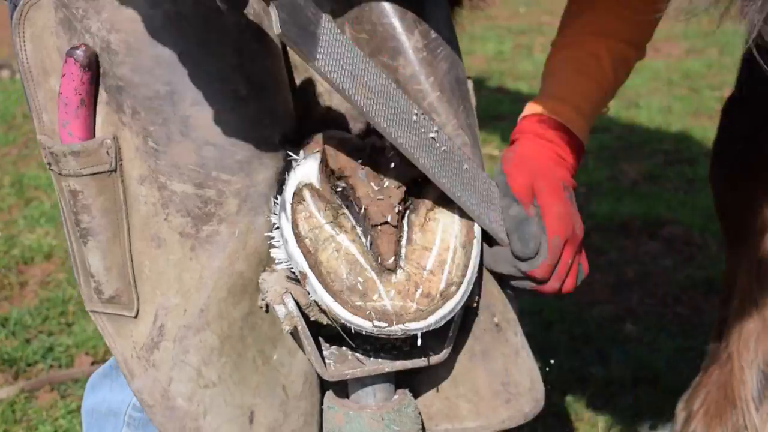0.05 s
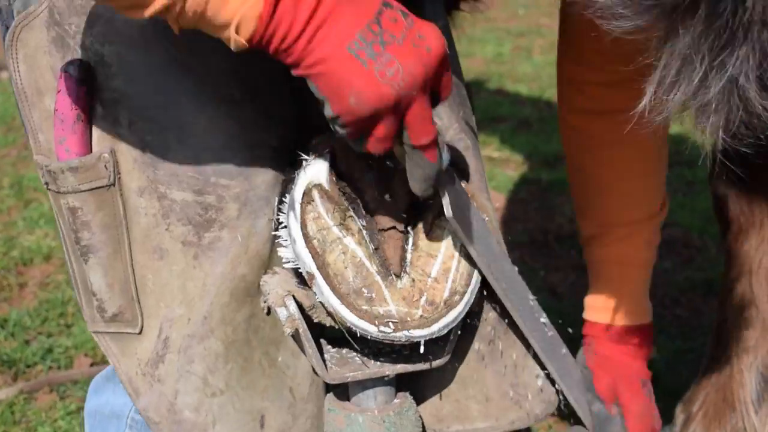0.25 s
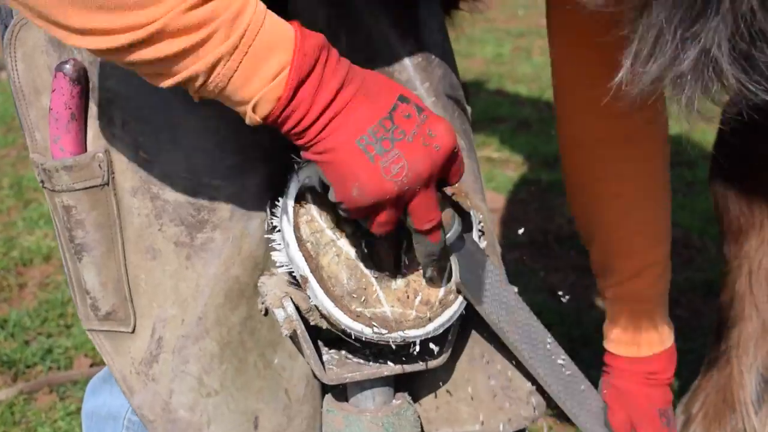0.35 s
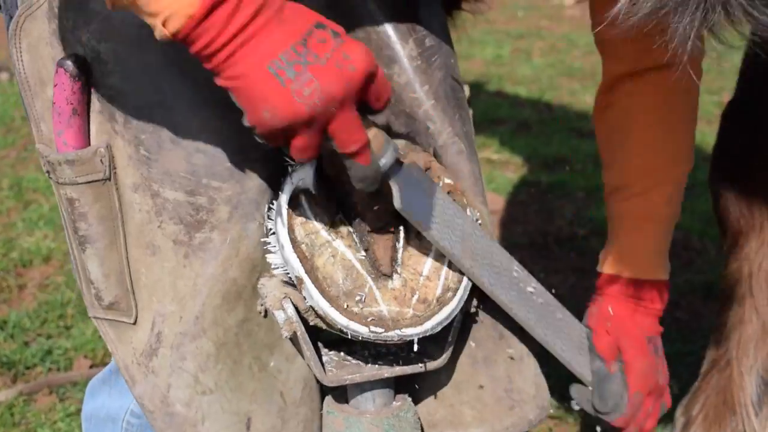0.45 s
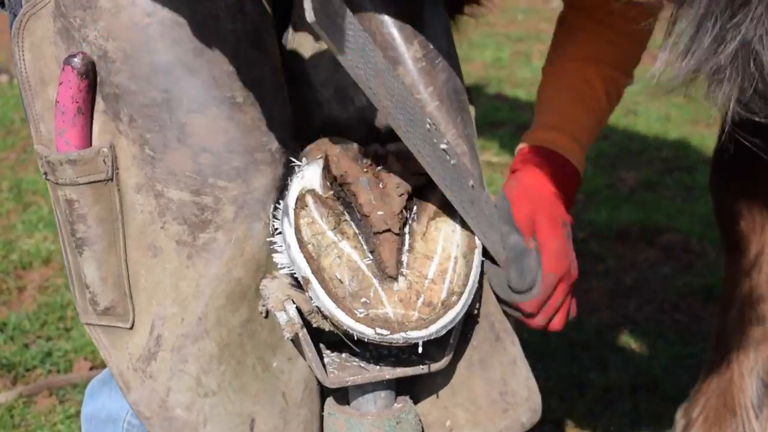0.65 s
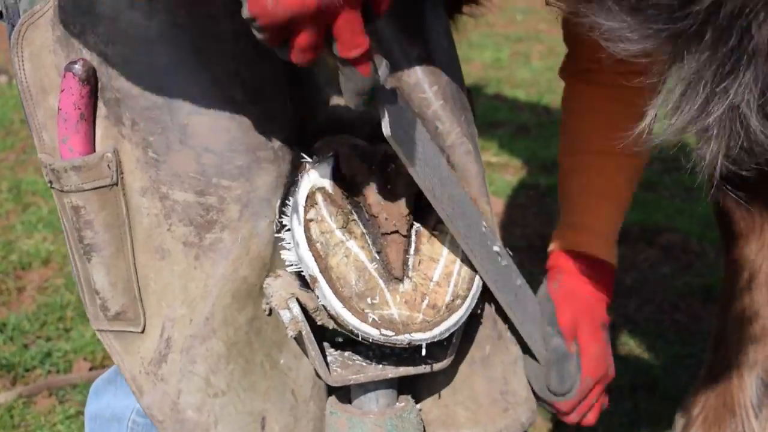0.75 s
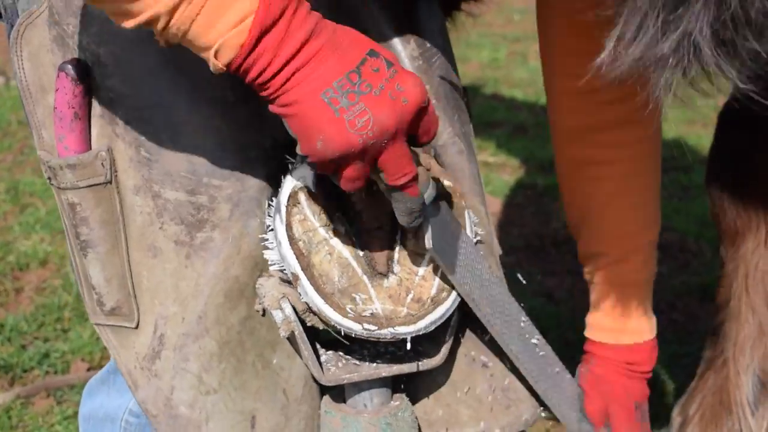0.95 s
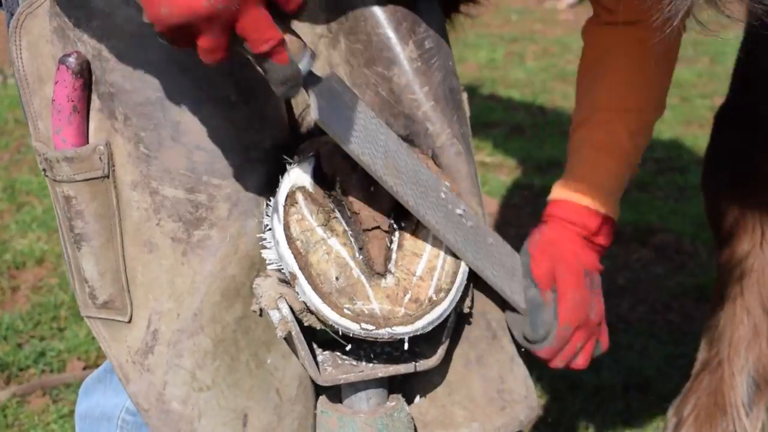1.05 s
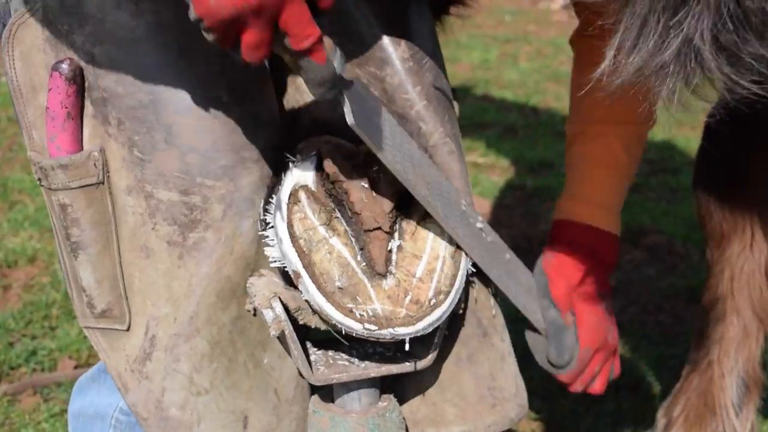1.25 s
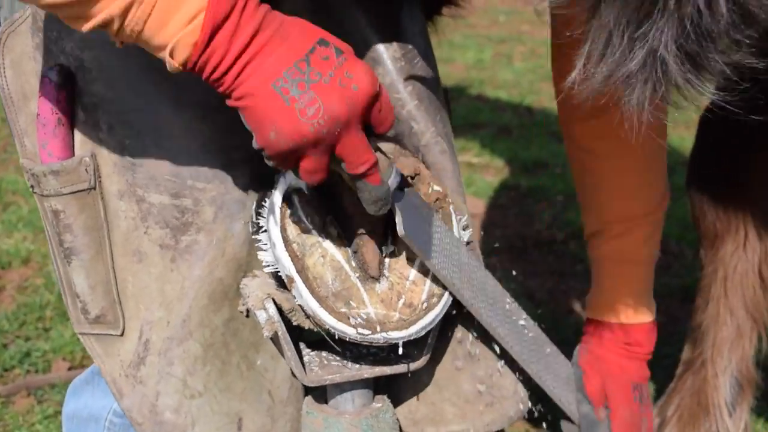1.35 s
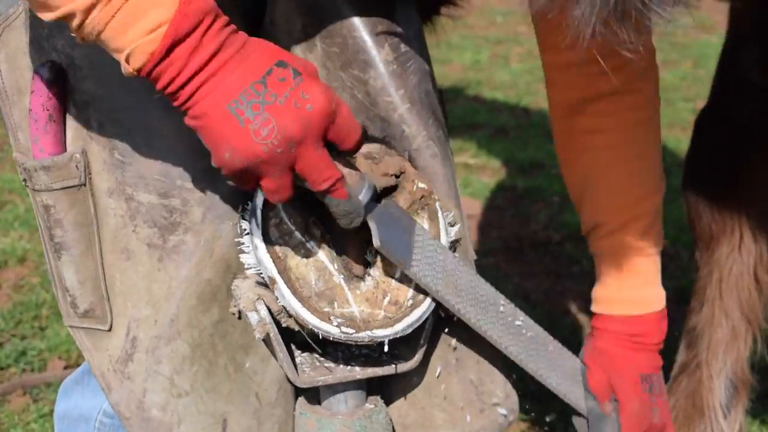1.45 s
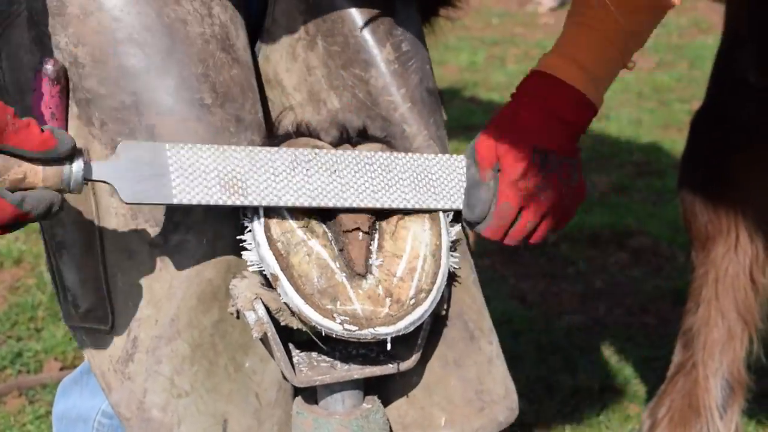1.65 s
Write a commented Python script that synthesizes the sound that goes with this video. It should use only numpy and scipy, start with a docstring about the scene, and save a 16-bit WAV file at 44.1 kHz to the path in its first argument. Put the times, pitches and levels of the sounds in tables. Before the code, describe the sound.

Close, gritty rasping on a horse's hoof outdoors, hard strokes alternating with squeaky, hissing returns.

```python
"""A steel rasp skates and squeaks over a horse's hoof, then bites in the first of three hard pushes.
A farrier is filing outdoors, close to the microphone, with faint air and a short yard echo behind.
On each push the tooth rows catch and judder the hoof under a gritty scrape of tearing horn.
On the light return strokes the rasp hisses and its steel rings; it lands with a crunch and a thud.
This close, the loudest judder clips."""
import sys
import numpy as np
from scipy import signal
from scipy.fft import rfft, irfft, next_fast_len
from scipy.io import wavfile
from scipy.ndimage import uniform_filter1d, map_coordinates

SR = 44100
rng = np.random.default_rng(int(sys.argv[2]) if len(sys.argv) > 2 else 0)


def store_pcm(level_fs):
    """Save levels as 16-bit WAV."""
    pcm = np.round(np.clip(level_fs, -1, 1) * 32767).astype(np.int16)
    wavfile.write(sys.argv[1], SR, np.atleast_2d(pcm).T)


N = 74970
TIME = np.arange(N) / SR


def amp(db):
    return 10 ** (np.asarray(db) / 20)


def unit(x):
    return x / np.sqrt(np.mean(x ** 2) + 1e-20)


def even(x, size=1100):
    """x held at a running rms of 1."""
    power = uniform_filter1d(uniform_filter1d(x ** 2, size), size // 2)
    return x / np.sqrt(np.abs(power) + 1e-3 * np.mean(x ** 2))


def wobble(rate):
    """A smooth random curve, rate knots a second."""
    return map_coordinates(rng.standard_normal(600), [TIME * rate], mode="wrap")


def envelope(strokes, column, fade_s=0.0081):
    """Gain per sample from one dB column of the strokes; silent between them."""
    gain = np.zeros(N)
    for rows in map(np.array, strokes):
        s = rows[:, 0]
        fade = np.clip(1 + np.minimum(TIME - s[0], s[-1] - TIME) / fade_s, 0, 1)
        gain += amp(np.interp(TIME, s, rows[:, column])) * fade
    return gain


def filtered(x, response):
    """x shaped by a gain that is a function of Hz."""
    size = next_fast_len(N + SR // 2)
    return irfft(rfft(x, size) * response(np.fft.rfftfreq(size, 1 / SR)), size)[:N]


def coloured(x, points):
    """x shaped by (Hz, dB) points on a log frequency axis."""
    knots_hz, db = np.transpose(points)
    return filtered(x, lambda hz: amp(np.interp(np.log(hz + 1), np.log(knots_hz), db)))


def ring(x, modes):
    """x through damped modes; dB is the relative energy of each."""
    t = np.arange(SR // 3) / SR
    impulse = np.zeros(len(t))
    for k, (hz, db, t60) in enumerate(modes):
        decay = np.exp(-np.log(1000) * t / t60)
        impulse += (-1) ** k * amp(db) / np.sqrt(t60) * decay * np.cos(2 * np.pi * hz * t)
    return signal.fftconvolve(x, impulse / np.linalg.norm(impulse))[:N]


# The open air around the microphone. Each row: frequency in Hz, relative level in dB.
AIR_COLOUR = [(25, -16), (150, 4.5), (300, -6), (1000, -7.5), (3000, -17.5), (8000, -31.5), (15000, -41)]
def air(level_db=-49):
    """Steady, low outdoor noise, well behind the work."""
    return amp(level_db) * unit(coloured(rng.standard_normal(N), AIR_COLOUR))


# The tone of the yard's echo. Each row: frequency in Hz, gain in dB.
YARD_COLOUR = [(100, -6), (500, -0.5), (1500, 3), (3000, -4), (12000, -25)]
def yard_echo(x, gain_db=-20, t60_s=0.23):
    """Ground and surroundings scatter a short, dull answer back to the microphone."""
    t = np.arange(SR // 2) / SR
    tail = rng.standard_normal(len(t)) * np.exp(-np.log(1000) * t / t60_s)
    echo = signal.fftconvolve(x, tail / np.linalg.norm(tail))[:N]
    return amp(gain_db) * coloured(echo, YARD_COLOUR)


# The rasp's modes. Each row: frequency in Hz, relative level in dB, 60 dB decay time in seconds.
STEEL_MODES = [(960, -7, 0.047), (1358, -1.5, 0.12), (1851, -3.5, 0.047), (3094, 0, 0.065),
               (3664, -0.5, 0.074), (4600, -2.5, 0.088), (4820, -8, 0.047), (5680, -9, 0.031),
               (5943, -1, 0.14), (7140, 0, 0.047), (8470, -4, .08), (9735, -12.5, 0.035),
               (11830, -14.5, 0.39), (13040, -13, .12), (13580, -16, 0.19)]
def steel(x, flicker_db=3, flicker_rate=35):
    """The rasp rings; each mode swells and fades as the contact passes its nodes."""
    total = np.linalg.norm([amp(db) for _, db, _ in STEEL_MODES])
    ringing = np.zeros(N)
    for hz, db, t60 in STEEL_MODES:
        flicker = unit(amp(flicker_db * wobble(flicker_rate)))
        ringing += amp(db) / total * ring(x * flicker, [(hz, db, t60)])
    return ringing


# Squeaks of the steel. Each row: centre in seconds, pitch in Hz, peak in dB, half length in seconds.
STEEL_SQUEAKS = [(.015, 1344, -33, 0.015), (0.065, 1317, -34, 0.005), (0.02, 7195, -34.5, 0.022),
                 (0.064, 7160, -31.5, .01), (0.357, 4740, -43, 0.035), (0.582, 8480, -35, 0.008),
                 (0.595, 5960, -37, 0.014), (0.621, 4810, -36, 0.015), (0.59, 5560, -36, .008),
                 (0.633, 4513, -34, 0.0076), (0.688, 3060, -51, 0.038), (1.101, 7190, -26.5, 0.0091),
                 (1.149, 5965, -45, 0.042), (1.185, 12040, -47.5, 0.025), (1.189, 4660, -49.5, 0.019),
                 (1.244, 4520, -36, 0.0099), (1.365, 7210, -27, 0.015), (1.608, 1312, -38.5, 0.049)]
def squeaks(waver_rad=0.21):
    """Friction locks briefly onto one mode of the rasp."""
    tones = np.zeros(N)
    for s, hz, db, half_s in STEEL_SQUEAKS:
        drift = unit(uniform_filter1d(uniform_filter1d(rng.standard_normal(N), size=200), size=200))
        swell = amp(db) * np.exp(-((TIME - s) / half_s) ** 2)
        tones += swell * np.sin(2 * np.pi * hz * TIME + waver_rad * drift)
    return tones


# The edge catches. Each row: centre in seconds, pitch in Hz, level in dB, half length in seconds.
EDGE_CATCHES = [(1.305, 4030, -30, 0.037), (0.216, 3900, -28.5, 0.021)]
def screeches(width_hz=420):
    """A rough, bright band of friction where the edge catches early in a push."""
    friction = np.zeros(N)
    for s, hz, db, half_s in EDGE_CATCHES:
        band = filtered(rng.standard_normal(N), lambda f: np.exp(-((f - hz) / width_hz) ** 2))
        swell = amp(db) * np.exp(-((TIME - s) / half_s) ** 2)
        friction += swell * unit(band)
    return friction


# Hoof and leg modes. Each row: frequency in Hz, relative level in dB, 60 dB decay time in seconds.
HOOF_MODES = [(120.3, -2, 0.074), (162.8, 0, 0.075), (218.3, -1, 0.045), (311, -8, 0.02)]
def hoof(x, low_hz=105, high_hz=350):
    """Hoof and leg boom when shaken, within their own low register."""
    boom = ring(x, HOOF_MODES)
    return filtered(boom, lambda hz: (1 - 1 / (1 + (hz / low_hz) ** 6)) / (1 + (hz / high_hz) ** 14))


def bursts(pulses, decay_s):
    """Each pulse becomes a short exponential tail."""
    return signal.lfilter([1], [1, -np.exp(-1 / (decay_s * SR))], pulses)


# The rasp lands on the hoof. Each row: start in seconds, crunch and thud strengths in relative dB.
LANDINGS = [(0.16, -30, -28), (0.216, -18.5, -36), (0.468, -22.5, -26.5), (1.017, -29, -38),
            (1.058, -33, -31), (1.22, -28, -32), (1.524, -44, -45)]
# The tone of the crunch. Each row: frequency in Hz, gain in dB.
CRUNCH_COLOUR = [(200, 9), (900, 7.5), (2500, 6), (4500, 0.5), (8000, -12), (15000, -27)]
def landings(crunch_db=-3, ring_db=-10, thud_db=21, rise_s=0.0018, decay_s=0.0055):
    """Steel meets horn with a short crunch, a ring and a soft thud."""
    blows, thuds = np.zeros(N), np.zeros(N)
    for s, blow_db, low_db in LANDINGS:
        at = round(s * SR)
        blows[at], thuds[at] = amp(blow_db), amp(low_db)
    contact = bursts(bursts(blows, decay_s), rise_s) / (rise_s * SR)
    crunch = contact * rng.standard_normal(N)
    return (amp(crunch_db) * coloured(crunch, CRUNCH_COLOUR)
            + amp(ring_db) * ring(crunch, STEEL_MODES)
            + amp(thud_db) * hoof(thuds))


def grit(chips_db, scatter_db, chips_per_s=5000):
    """Horn breaks away as fine hiss plus separate chips of uneven size."""
    breaks = (rng.random(N) < chips_per_s / SR) * rng.choice([-1, 1], N)
    sizes = amp(scatter_db * np.clip(rng.standard_normal(N), -2, 2))
    return unit(rng.standard_normal(N) + amp(chips_db) * unit(breaks * sizes))


def moving_contact(x, patchy_db):
    """Peaks and dips wander through the spectrum as the contact moves along the rasp."""
    spectra = signal.stft(x, nperseg=512)[2]
    patches = uniform_filter1d(rng.standard_normal(spectra.shape), size=4, axis=0)
    patches = unit(uniform_filter1d(patches, size=7, axis=1))
    return unit(signal.istft(spectra * amp(patchy_db * patches), nperseg=512)[1][:N])


# Four return strokes, a list each. Each row: time in seconds, scrape and rumble in relative dB.
RETURN_STROKES = [
    [(0.0, -25.5, -31.5), (0.04, -29.5, -40), (0.06, -30, -54), (0.116, -39, -48.5), (0.135, -66, -59)],
    [(0.49, -44.5, -37.5), (0.518, -33.5, -59), (0.54, -28.5, -33), (0.574, -33.5, -46), (0.6, -32.5, -41),
     (0.628, -32.5, -56), (0.656, -37.5, -41), (0.675, -70, -69)],
    [(1.03, -33.5, -38), (1.048, -47, -68), (1.06, -31.5, -42), (1.078, -32, -35), (1.096, -31.5, -39.5),
     (1.156, -31, -68), (1.194, -46.5, -50), (1.205, -52, -58)],
    [(1.505, -66, -61), (1.529, -41.5, -58), (1.539, -62, -48), (1.555, -45.5, -58.5), (1.611, -41.5, -54),
     (1.649, -40.5, -65), (1.673, -41.5, -38), (1.7, -50, -55)],
]
# The tilt of the rasp lifts or dulls the treble. Each entry: one return's treble gain in dB.
TILT_DB = [-10, 7, -8, 9]
# The tone of the skating rasp. Each row: frequency in Hz, gain in dB.
SKATE_COLOUR = [(200, -3.5), (450, 4.5), (800, -3), (1350, 7.5), (2100, 2), (2800, 2.5), (3350, -3.5),
                (3800, -3), (5200, -12.5), (6800, -18), (8900, -29.5), (9750, -15), (10400, -25.5),
                (13000, -26), (15500, -55)]
def return_strokes(hiss_db=-2, ring_db=-6, rumble_db=5, treble_hz=7500):
    """Drawn back lightly, the rasp hisses and rings while the hoof barely rumbles."""
    scrape, rumble = envelope(RETURN_STROKES, column=1), envelope(RETURN_STROKES, column=2)
    skating = grit(chips_db=1.5, scatter_db=3.5)
    hiss = moving_contact(coloured(skating, SKATE_COLOUR), patchy_db=3.5)
    treble = filtered(hiss, lambda hz: 1 - 1 / (1 + (hz / treble_hz) ** 4))
    sheen = sum((amp(db) - 1) * envelope([stroke], column=1)
                for stroke, db in zip(RETURN_STROKES, TILT_DB))
    drone = even(hoof(rng.standard_normal(N), low_hz=120, high_hz=207), size=700)
    return (amp(hiss_db) * (scrape * hiss + sheen * treble)
            + amp(ring_db) * steel(scrape * skating)
            + amp(rumble_db) * rumble * drone)


# The rasp's speed, a list per push. Each row: time in seconds, tooth rows passing per second.
RASP_SPEED = [
    [(.16, 159.3), (.225, 129.2), (.255, 135.4), (.283, 193.1), (.31, 170.7), (.338, 199.9), (.38, 136.7)],
    [(.70, 149.6), (.755, 184.7), (.787, 323.4), (.812, 243.6), (.85, 264.9), (.895, 185.8), (.94, 148.9)],
    [(1.22, 161.1), (1.275, 149.5), (1.305, 290.6), (1.322, 321.2), (1.345, 226.9), (1.365, 222.5),
     (1.385, 172.8), (1.43, 131)],
]
def teeth(jitter_periods=0.1, scatter_db=4.5, slip_periods=0.11, sway_db=3.1):
    """One pulse for each tooth row that catches the hoof, and the hoof's rocking at that rate."""
    s, hz = np.concatenate(RASP_SPEED).T
    rows_passed = np.cumsum(np.interp(TIME, s, hz)) / SR
    count = int(rows_passed[-1])
    lateness, size = rng.standard_normal((500, 2))[:count].T
    catches = np.searchsorted(rows_passed, np.arange(count) + jitter_periods * lateness)
    pulses = np.bincount(catches, amp(scatter_db * size), N + 1)[:N]
    phase = 2 * np.pi * (rows_passed + slip_periods * wobble(90))
    rocking = np.cos(phase) * amp(sway_db * wobble(70))
    return pulses, rocking


# Horn wall modes. Each row: frequency in Hz, relative level in dB, 60 dB decay time in seconds.
WALL_MODES = [(442, -3, 0.056), (534, -1, 0.06), (663, 1, 0.061), (829, -4, 0.029), (985, -7, .035),
              (1149, -7.5, 0.017)]
# The tone of the cutting scrape. Each row: frequency in Hz, gain in dB.
CUT_COLOUR = [(300, -9), (700, -1.5), (1200, 0), (2300, 0), (2800, -4.5), (3400, -3.5), (3750, -5.5),
              (4600, -3.5), (5300, -10.5), (5800, -5.5), (6400, -11), (8000, -15), (9800, -15),
              (13000, -21), (15500, -33)]
# Three pushes, close up, a list each. Each row: time in seconds, judder, scrape and wall in relative dB.
PUSH_STROKES = [
    [(0.162, -26.5, -42.5, -58), (0.178, -33, -31.5, -35), (0.216, -7.5, -25.5, -31),
     (0.236, -5, -22, -14.5), (0.286, -4, -25.5, -22.5), (0.318, -6.5, -26, -22.5),
     (0.326, -7.5, -27.5, -30), (0.356, -10, -32, -25.5), (0.374, -22.5, -45.5, -46),
     (0.386, -17.5, -41, -28.5), (0.404, -39, -56, -36.5), (0.408, -42, -68, -41), (0.43, -37, -66, -65)],
    [(0.69, -45, -46, -56), (0.7, -27.5, -39, -45), (0.722, -33.5, -32.5, -34), (0.736, -22, -32.5, -38),
     (0.746, -14.5, -28, -28), (0.772, -19, -23, -25.5), (0.784, -9, -24.5, -16.5),
     (0.802, -2.5, -22.5, -16.5), (0.842, -15, -24, -19.5), (0.896, -6.5, -27, -24.5),
     (0.922, -12, -36, -33), (0.956, -41, -77, -40), (0.99, -58, -73, -78)],
    [(1.224, -33, -39, -52), (1.258, -18, -31.5, -32.5), (1.286, -13, -26.5, -26.5),
     (1.314, -9.5, -23.5, -14.5), (1.368, -9.5, -23, -23), (1.386, -2, -28, -20), (1.398, -8.5, -27, -35),
     (1.426, -20.5, -38, -32.5), (1.44, -29, -40.5, -52), (1.448, -44, -76, -40), (1.48, -73, -66, -70)],
]
def pushes(judder_db=0.5, wall_db=-1, cut_db=-0.5, ring_db=-12, groan_db=3.5, crumble_db=-6.5):
    """The teeth shake hoof and wall, and tear off horn in bursts."""
    judder, scrape, knock = (envelope(PUSH_STROKES, column) for column in (1, 2, 3))
    pulses, rocking = teeth()
    chatter = 0.45  # depth of the scrape's pulsing at the tooth rate
    bite = even(1 - chatter + chatter * unit(bursts(pulses, decay_s=0.0036)))
    horn = grit(chips_db=-3.5, scatter_db=4)
    tearing = bite * horn
    groan = amp(groan_db) * unit(rocking)  # a clean tone over the rough boom
    crumble = amp(crumble_db) * unit(hoof(tearing))
    boom = even(groan + even(hoof(pulses)) + crumble, size=700)
    wall_force = moving_contact(unit(pulses) + amp(-2) * tearing, patchy_db=2.0)
    wall = even(ring(wall_force, WALL_MODES))
    cut = bite * moving_contact(coloured(horn, CUT_COLOUR), patchy_db=2.5)
    return (amp(judder_db) * judder * boom
            + amp(wall_db) * knock * wall
            + amp(cut_db) * scrape * cut
            + amp(ring_db) * steel(scrape * tearing))


def scene():
    """One microphone near the hoof: the filing in front, yard and air behind."""
    background = air()
    filing = pushes() + return_strokes() + landings() + squeaks() + screeches()
    return (filing + yard_echo(filing) + background)[None]


def record(dry, low_cut_hz=37.3, top_hz=15700):
    """The microphone sheds deep bass; the recorder flattens the highest peaks and limits the band."""
    heard = filtered(dry[0], lambda hz: 1 - 1 / (1 + (hz / low_cut_hz) ** 2))
    clipped = heard / (1 + np.abs(heard) ** 20) ** (1 / 20)
    return filtered(clipped, lambda hz: hz < top_hz)[None]


dry = scene()
out = record(dry)
store_pcm(out)
```